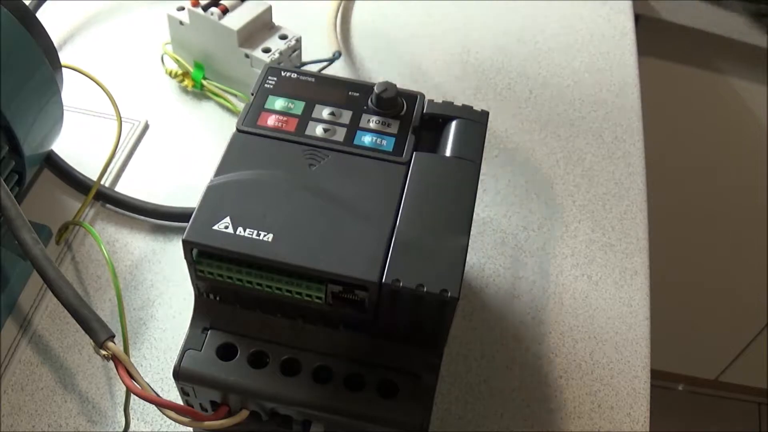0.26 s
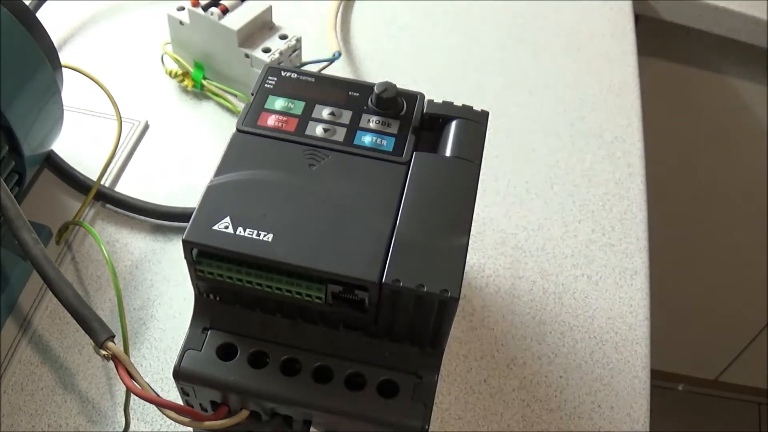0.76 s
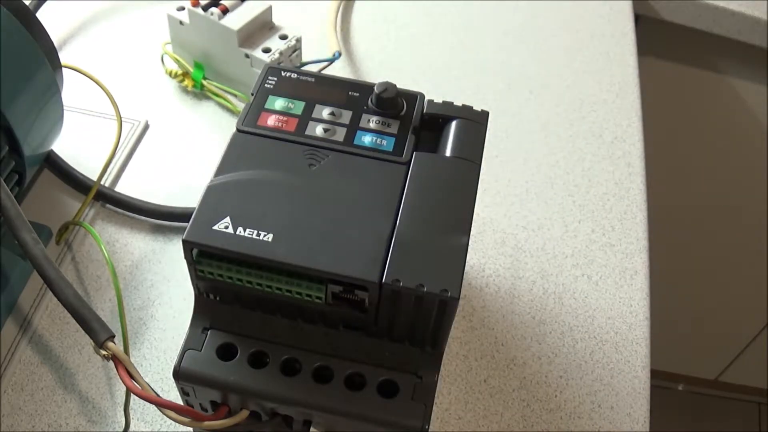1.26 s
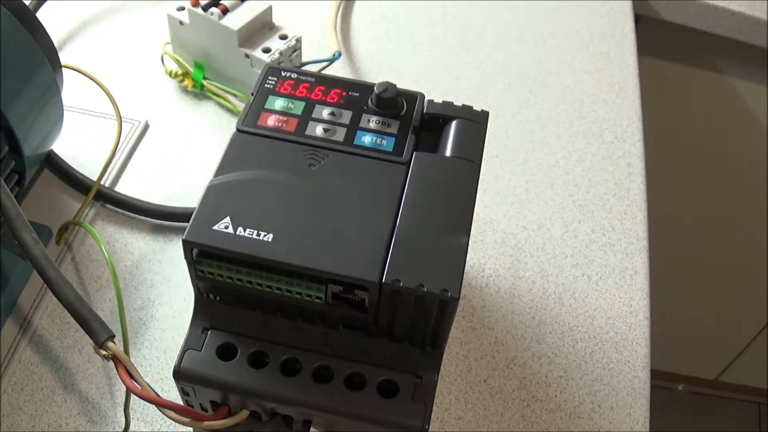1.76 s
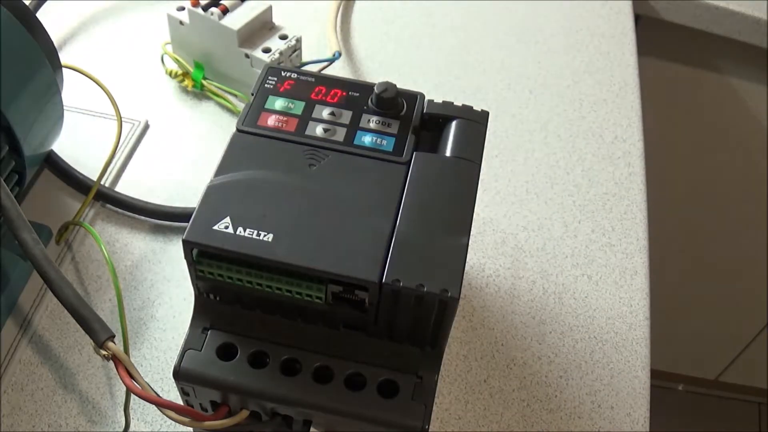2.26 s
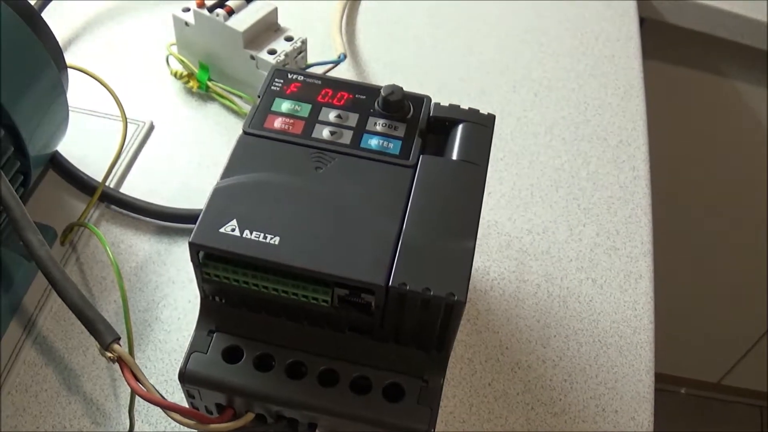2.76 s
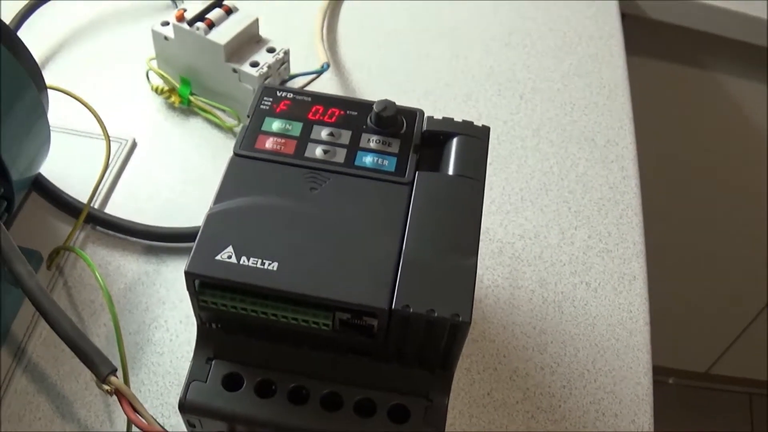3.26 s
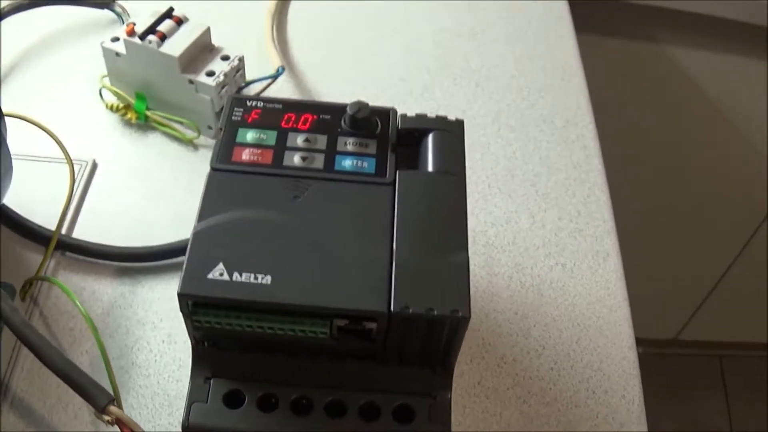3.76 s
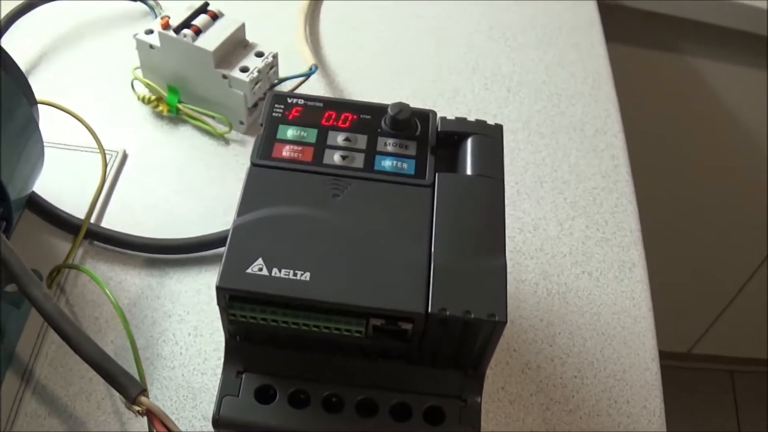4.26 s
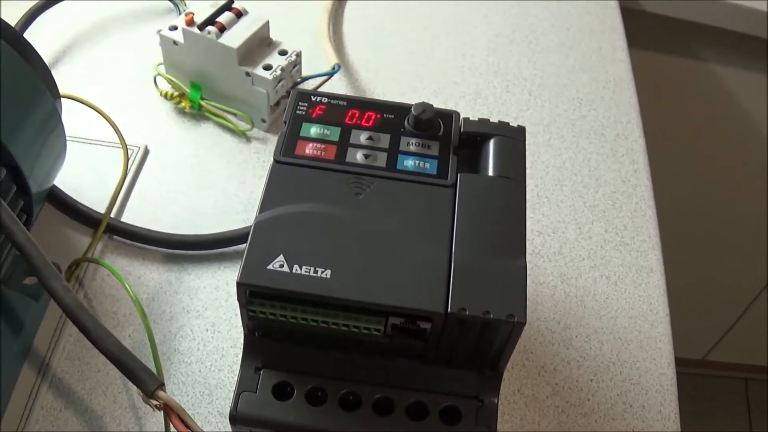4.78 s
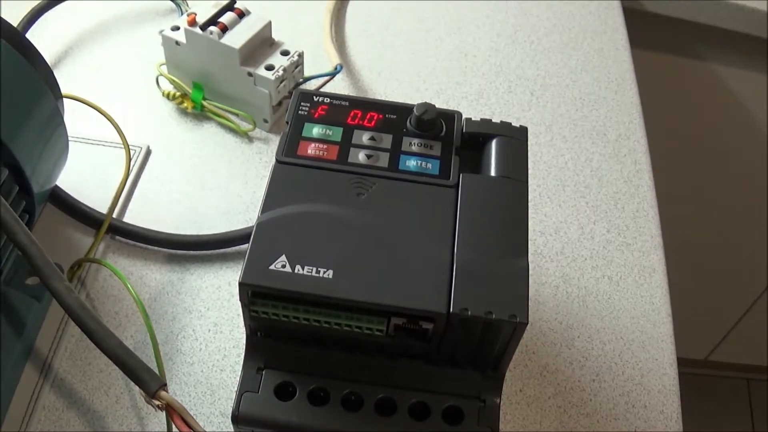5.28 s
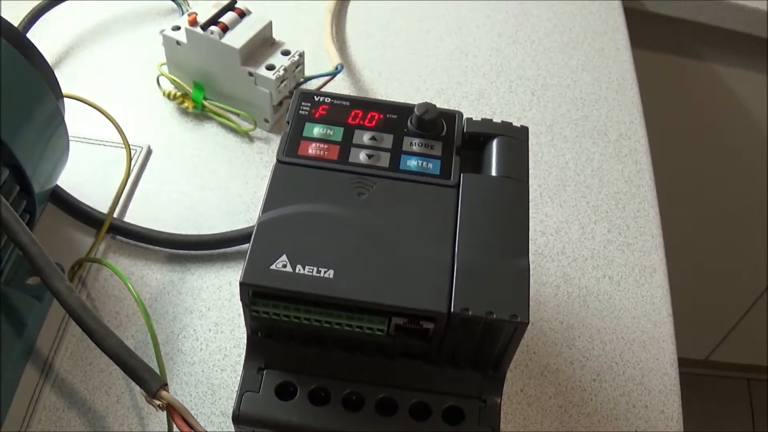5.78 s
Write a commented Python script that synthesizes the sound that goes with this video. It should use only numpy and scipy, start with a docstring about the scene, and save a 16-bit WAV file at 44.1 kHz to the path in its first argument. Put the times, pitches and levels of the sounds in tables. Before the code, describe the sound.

The sound opens on the tail of a circuit breaker's snap, a mid-range knock ringing off the workshop walls and fading over less than a second. Faint hiss and very weak mains hum remain. At about 1.9 s a relay inside a small motor drive clacks, bright and sharp, with several rapid bounces rattling the plastic case and a short room echo. From 2.1 s the cooling fan starts, becoming clear around 2.5 s; its blade tone glides upward and airy rush swells, approaching full speed by 4 s, with a pitch a little above 600 Hz. A small knock comes at 2.6 s. Between 2.9 and 3.9 s the moving camera brings rumble, stuttering low thuds, creaks and bumps. The fan gets nearer and brighter, over a soft low drone. It holds steady to 6 s, with sharp ticks near 4.5, 4.7 and 5.9 s and dull bumps near 4.6 and 5.6 s.

```python
"""In a workshop, a circuit breaker that has just snapped on rings away over faint hiss and mains hum.
A small motor drive wakes: its relay bounces and rattles the case, then its seven-bladed fan spins up.
The fan is phase-driven blade and rotor tones over noise shaped by its ducts, both growing with speed.
A camera carries the microphones closer: shaped noise gives its mount's rumble, ticks, creaks and bumps,
sine pulses that swell and fade give its judder, and a soft low drone fades in."""
import sys
import numpy as np
from scipy import signal
from scipy.fft import rfft, irfft
from scipy.io import wavfile

SR = 44100
rng = np.random.default_rng(int(sys.argv[2]) if len(sys.argv) > 2 else 0)


def store_pcm(level_fs):
    """Save levels as 16-bit WAV."""
    pcm = np.round(np.clip(level_fs, -1, 1) * 32767).astype(np.int16)
    wavfile.write(sys.argv[1], SR, np.atleast_2d(pcm).T)


N = 265790
T = np.arange(N) / SR  # s
HZ = np.fft.rfftfreq(N, 1 / SR)

# First strike of the relay contacts, in seconds
RELAY_S = 1.9303
# Start of the fan in seconds, the blade rate it nears in Hz, time constant of its spin-up in seconds
FAN_ON_S, FULL_HZ, SPIN_UP_S = 2.1, 637.6, 0.52
# How the microphones move in on the fan. Each row: time in seconds, nearness in dB.
NEARNESS = [(2.8, -9.5), (3.3, -6), (3.8, -5), (4.0, -3.5), (4.4, -2), (4.8, -1.24), (5.5, -0.5),
            (6.03, -1)]


def amp(db):
    """Decibels to gain."""
    return 10 ** (np.asarray(db) / 20)


def unit(x):
    """Scales to rms 1."""
    return x / np.sqrt(np.mean(x ** 2) + 1e-20)


def read(points, hz):
    """Reads a table on a log-frequency axis."""
    f, value = np.transpose(points)
    return np.interp(np.log(hz + 1), np.log(f + 1), value)


def curve(rows):
    """A time table, at every sample."""
    return np.interp(T, *np.transpose(rows))


def ramp(start, end):
    """Rises in a straight line from 0 to 1 between two times in seconds."""
    return np.clip((T - start) / (end - start), 0, 1)


def add(mix, s, sound):
    """Mixes a stereo sound in at time s."""
    part = mix[:, max(round(s * SR), 0):][:, :sound.shape[1]]
    part += sound[:, :part.shape[1]]


def pan(x, left_db):
    """Makes the left channel louder than the right by left_db."""
    return x * amp([[left_db / 2], [-left_db / 2]])


def peak(hz, centre, width):
    """Bell of one resonance, 1 at its centre."""
    return 1 / (1 + ((hz - centre) / width * np.sqrt(2)) ** 2)


def noise(gain, spread=0.96, size=N):
    """Stereo noise of rms 1 with a given spectrum; spread widens it."""
    # Likeness of the two microphone channels. Each row: frequency in Hz, correlation from -1 to 1.
    likeness = [(50, 1), (150, 0.98), (320, 0.72), (700, 0.66), (1500, 0.75), (3000, 0.77), (5000, 0.72),
                (9000, 0.97), (14000, 1)]
    hz = np.fft.rfftfreq(size, 1 / SR)
    mid, side = rfft(rng.standard_normal((2, size)))
    alike = np.clip(read(likeness, hz), 0, 1)
    side = side * spread * np.sqrt((1 - alike) / (1 + alike))
    return unit(irfft(np.array([mid + side, mid - side]) * gain, size))


def drift(rate_hz):
    """Slow random wandering of rms 1, mostly below rate_hz."""
    return unit(irfft(rfft(rng.standard_normal(N)) / (1 + (HZ / rate_hz) ** 4), N))


def room_tail(gain, spread):
    """Diffuse sound of the workshop, each band dying at its own speed."""
    # Ring of the room. Each row: frequency in Hz, time to die by 60 dB in seconds.
    ring_times = [(150, 0.77), (500, 0.73), (1200, 0.75), (2500, 0.96), (5000, 0.63), (8500, 0.6),
                  (14000, 0.3)]
    burst = noise(gain, spread)[:, :2 * SR]
    hz, t, bands = signal.stft(burst, SR, nperseg=512)
    decay = amp(-60 * t / read(ring_times, hz)[:, None])
    return signal.istft(bands * decay, SR, nperseg=512)[1]


def breaker(level_db=-21.0, early_db=0, early_s=0.0028):
    """The last strong reflections of the snap, then the room's decay."""
    # The snap as the room returns it. Each row: frequency in Hz, relative density in dB per Hz.
    snap = [(35, -64), (60, -40), (102, -12.5), (129, -25), (190, -2), (269, -12.5), (339, -9.5),
            (564, -7.5), (605, -1), (960, -7.5), (1100, 2), (1390, -4.5), (2530, -21.5), (8040, -28.5),
            (15000, -59)]
    out = np.zeros((2, N))
    add(out, 0, room_tail(amp(read(snap, HZ)), spread=0.95))
    reflections = 1 + amp(early_db) * np.exp(-T / early_s)
    return out * amp(level_db) * reflections * ramp(0, 0.0014)


def still_room(hiss_db=-53, waver=0.3, rate_hz=3):
    """Faint hiss and a slightly wavering mains hum."""
    # Hiss of the still room. Each row: frequency in Hz, relative density in dB per Hz.
    hiss = [(30, -10), (50, -4), (80, -9), (135, -4), (175, 0), (240, -5), (290, -3), (600, -7),
            (1500, -10.5), (3400, -15), (6000, -17.5), (9200, -17), (12000, -23), (15500, -28)]
    # Hum lines. Each row: frequency in Hz, rms level in dB before the wavering.
    hum_lines = [(49, -65.5), (199, -67)]
    hum = 0
    for hz, db in hum_lines:
        phase = 2 * np.pi * hz * T + waver * drift(rate_hz)  # waver in radians here
        swell = 1 + waver * drift(rate_hz)  # and as a share of the level here
        hum = hum + amp(db) * np.sqrt(2) * np.sin(phase) * swell
    return amp(hiss_db) * noise(amp(read(hiss, HZ))) + hum


def contact_force(t, rebound_db=-8, loss_db=2.0, close_s=0.00052, contact_s=0.0011, count=4):
    """The contacts strike, then bounce ever sooner and more weakly."""
    first_gap_s, gap_keep = 0.0034, 0.86  # each next gap keeps this share of the last

    def blow(s):
        """One blow: a quick rise to time s, a slower fall."""
        return np.exp(-abs(t - s) / np.where(t < s, close_s, contact_s))

    bounces = RELAY_S + np.cumsum(first_gap_s * gap_keep ** np.arange(count))
    rebounds = sum(amp(rebound_db - loss_db * k) * blow(s) for k, s in enumerate(bounces))
    return blow(RELAY_S) + rebounds


def relay(strike_db=-22.5, room_db=-29, build_s=0.0049, size=2048):
    """Bouncing contacts rattle the plastic case, and the room answers."""
    # Resonances of relay and case. Each row: centre in Hz, width in Hz, relative level in dB.
    case_modes = [(900, 170, -4), (1400, 350, -7.5), (1950, 330, -8), (2550, 330, -7.5), (4600, 420, -9),
                  (5800, 300, -11), (6400, 350, -2), (7250, 450, -6), (8300, 500, 5), (9150, 450, 0),
                  (10200, 500, 4), (12200, 2000, -17), (14500, 1200, -27)]
    # Colour that the room gives the relay. Each row: frequency in Hz, gain in dB.
    room_colour = [(300, -8), (880, 8), (1400, -3.5), (2500, -4.5), (4600, 4), (6400, -0.5), (8300, -4),
                   (10500, -3), (14000, 1)]
    start = RELAY_S - 0.0014  # room for the rise of the first blow
    t = start + np.arange(size) / SR
    modes = sum(amp(db) * peak(HZ, hz, width) for hz, width, db in case_modes)
    body = modes * HZ ** 2 / (HZ ** 2 + 450 ** 2) + 1e-4  # weak below 450 Hz
    # minimum phase: the case rings only after a blow
    log_body = np.log(np.r_[body, body[-2:0:-1]])
    causal = np.exp(np.conj(signal.hilbert(log_body)))
    ring = irfft(causal[:len(HZ)], N)[:size]
    rattle = contact_force(t) * noise(1, size=size)
    clack = unit(signal.oaconvolve(rattle, ring[None], axes=1)[:, :size])
    out = np.zeros((2, N))
    answer = room_tail(body * amp(read(room_colour, HZ)), spread=1.15)
    add(out, start, amp(room_db) * answer)
    out *= ramp(start, start + build_s)  # the room takes a moment to fill
    add(out, start, pan(amp(strike_db) * clack, left_db=2.5))
    return out


def fan_motor(level_db=-58):
    """The motor's switching rings the fan frame, fading in from the moment it is powered."""
    # Resonances of the frame. Each row: centre in Hz, width in Hz, relative level in dB.
    frame_modes = [(1630, 80, 0), (6300, 300, -13)]
    frame = sum(amp(db) * peak(HZ, hz, width) for hz, width, db in frame_modes)
    return amp(level_db) * noise(frame) * ramp(FAN_ON_S, 2.52)


def speed():
    """Share of full fan speed: the motor's push fades as the rotor gains on it."""
    return 1 - np.exp(-np.maximum(T - FAN_ON_S, 0) / SPIN_UP_S)


def airflow(growth_db):
    """Gain of a fan sound that grows by growth_db for each tenfold of speed."""
    return amp(growth_db * np.log10(speed() + 1e-4))


def rush_level(full_db=-28.5, growth_db=75.5):
    """The rush of air grows with speed and with the microphones' approach."""
    return amp(full_db + curve(NEARNESS)) * airflow(growth_db)


def fan_air(brighten_db=12, chop=0.079, swell_db=0.32):
    """Turbulence in the ducts, chopped by the blades and duller while the fan is slow."""
    # Rush of air. Each row: frequency in Hz, relative density in dB per Hz.
    rush = [(30, 8.5), (100, -8.5), (350, -4), (600, 4), (1200, -0.5), (2300, -2.5), (3400, -5.5),
            (5800, -9), (7600, -3), (9300, -4), (11000, -11.5), (12200, -18.5), (15500, -25.5)]
    # Resonances of the air ducts. Each row: centre in Hz, width in Hz, lift in dB.
    ducts = [(428, 21, 9), (685, 213, 5.5), (1010, 200, 6.5), (1383, 66, 6), (1784, 420, 12.5),
             (2653, 136, 7.5), (2960, 280, 7), (3630, 430, 7), (4280, 990, 7), (5400, 460, 4),
             (6150, 190, 4), (9440, 440, 4.5)]
    lift_db = sum(db * peak(HZ, hz, width) ** 2 for hz, width, db in ducts)
    air = noise(amp(read(rush, HZ) + lift_db))
    low = irfft(rfft(air) / (1 + (HZ / 3500) ** 4), N)
    # fine eddies need speed: the treble gains brighten_db per doubling
    air = low + (air - low) * amp(brighten_db * np.log2(speed() + 1e-3))
    air *= 1 + chop * np.cos(2 * np.pi * np.cumsum(FULL_HZ * speed()) / SR)
    return pan(air * rush_level() * amp(swell_db * drift(13.5)), left_db=0.4)


def knock(centre, octaves, decay, size=8192):
    """A short dying burst in one band: centre in Hz, decay in seconds."""
    t, hz = np.arange(size) / SR, np.fft.rfftfreq(size, 1 / SR)
    burst = noise(np.exp(-(np.log2((hz + 1) / centre) / octaves) ** 2), size=size)
    return burst * np.exp(-t / decay) * (1 - np.exp(-t * centre * 2))


def knocks():
    """Ticks of plastic, creaks of the mount and bumps on the camera: dying bursts of noise."""
    # Levels below are those of the bursts before they decay.
    # Ticks of plastic. Each row: start in seconds, level in dB, centre in Hz, width in octaves.
    ticks = [(2.315, -47, 3700, .7), (2.636, -36, 2960, 1.44), (2.639, -28.5, 960, 0.82),
             (2.6545, -40.5, 3300, 0.58), (2.872, -42, 8950, 0.31), (4.483, -22, 8300, .3),
             (4.741, -26, 9000, 0.26), (5.944, -22, 8720, 0.21), (5.984, -26.5, 6200, .25)]
    # Sharp clicks of the creaking mount. Each row: start in seconds, level in dB.
    creaks = [(3.006, -40), (3.062, -34), (3.107, -28.5), (3.297, -28), (3.346, -29.5), (3.390, -30),
              (3.473, -30), (3.825, -27)]
    # Dull bumps on the camera body.
    # Each row: start in seconds, level in dB, centre in Hz, width in octaves, decay in seconds.
    bumps = [(2.94, -33.5, 230, 1.9, 0.012), (3.10, -26.5, 280, 1.6, 0.01),
             (3.382, -24.5, 170, 3.05, 0.012), (3.815, -25, 130, 0.99, .018), (3.885, -37, 250, 1.6, .01),
             (4.578, -27.5, 115, 1.3, 0.022), (4.609, -32, 55, 0.83, 0.027),
             (5.592, -30.5, 280, .68, 0.019)]
    out = np.zeros((2, N))
    for s, db, centre, octaves in ticks:
        add(out, s, amp(db) * knock(centre, octaves, decay=0.0035))
    for s, db in creaks:
        add(out, s, amp(db) * knock(centre=3400, octaves=0.96, decay=0.0021))
    for s, db, centre, octaves, decay in bumps:
        add(out, s, amp(db) * knock(centre, octaves, decay))
    return out


def standing_waves(hz, far_share=0.35, near_share=0.11):
    """The room's echo adds to the rising tone or weakens it, less so once the camera is close."""
    dip_hz, spacing_hz = 579.3, 17  # one dip, and the spacing of the dips
    share = far_share + (near_share - far_share) * ramp(3.84, 4.1)
    return abs(1 - share * np.exp(2j * np.pi * (hz - dip_hz) / spacing_hz))


def fan_tones(flutter=0.026, rotor_flutter=0.58, lead=0.079):
    """Blades chop the air past the struts; eddies make the upper harmonics flutter more."""
    # Weak lines of the unbalanced rotor.
    # Each row: multiple of the shaft rate, dB against the rush of air at full speed.
    rotor_lines = [(1, -27.5), (2, -28), (3, -26.5), (9, -19.5), (10, -23.5), (11, -25.5), (12, -21),
                   (29, -26.5), (42, -21), (56, -25.5)]
    # Overtones of the blades, at full speed and before the housing's lift.
    # Each row: multiple of the blade rate, level in dB off the outlet's axis, dB gained on its axis,
    # growth in dB per tenfold speed, flutter as a share.
    overtones = [(2, -53.5, 11.5, 27, .33), (3, -49.5, 3, 106, 0.14), (4, -56.5, 12, 62, 0.39)]
    blades = 7
    blade_db, blade_growth_db = -20.5, 96  # at full speed; per tenfold speed
    focus = 1.59  # dB that the blade tone gains per dB of nearness
    housing_hz, housing_width_hz, housing_db = 1797, 305, 13  # band that lifts a passing overtone
    hz = FULL_HZ * speed()
    angle = 2 * np.pi * np.cumsum(hz) / SR
    ports = np.array([[lead / 2], [-lead / 2]])  # radians: the left microphone leads

    def line(multiple, depth, offset):
        """One fluttering tone, of rms 1 before its flutter."""
        wobble = 1 + depth * (drift(22) + 1j * drift(8.1))
        return np.sqrt(2) * (wobble * np.exp(1j * (multiple * angle + offset))).real

    blade = amp(blade_db + focus * curve(NEARNESS)) * airflow(blade_growth_db)
    out = blade * standing_waves(hz) * line(1, flutter, ports / 2)
    in_beam = ramp(4.16, 4.34)  # the microphones enter the outlet's beam
    for order, db, beam_db, growth_db, depth in overtones:
        housing = 1 / (1 + (2 * (order * hz - housing_hz) / housing_width_hz) ** 4)
        level = amp(db + housing_db * housing + beam_db * in_beam) * airflow(growth_db)
        out += level * line(order, depth, ports)
    rotor = sum(amp(db) * line(order / blades, rotor_flutter, ports) for order, db in rotor_lines)
    out += rush_level() * speed() ** 2 * rotor
    return pan(out, left_db=2.0) * ramp(2.38, 2.63)


def handling(lump_db=3.0):
    """The camera's mount rubs unevenly as each push swells and eases."""
    # Pushes that shift the camera.
    # Each row: time of greatest force in seconds, level in dB, rise in seconds, fall in seconds.
    pushes = [(2.78, -53, 0.022, 0.092), (3.42, -33.5, .27, .29), (3.82, -32, 0.096, 0.07)]
    # Rumble of the mount. Each row: frequency in Hz, relative density in dB per Hz.
    rumble = [(15, -38), (25, -7), (91, 2.5), (113, -2), (140, -2), (298, -6.5), (378, -15), (420, -12),
              (550, -14), (920, -120)]
    force = 0
    for s, db, rise, fall in pushes:
        force = force + amp(db) * np.exp(-((T - s) / np.where(T < s, rise, fall)) ** 2)
    return force * amp(lump_db * drift(34)) * noise(amp(read(rumble, HZ)), spread=1.0)


def judder(first_db=-37, last_db=-31, hz=85, length_s=0.012, count=10):
    """The mount sticks and slips under a growing push; each slip is a soft low thud."""
    first_slip_s, every_s = 3.034, 0.0478
    out, t = np.zeros((2, N)), np.arange(-2048, 2048) / SR  # t = 0 is the middle of a thud
    for k, db in enumerate(np.linspace(first_db, last_db, count)):
        tone = np.sin(2 * np.pi * hz * t + rng.standard_normal())
        thud = amp(db) * np.exp(-(t / length_s) ** 2) * tone
        add(out, first_slip_s + k * every_s + t[0], np.array([thud, thud]))
    return out


def drone(hz=161, width=14, level_db=-47, sink_db=-5):
    """A soft low drone of narrow noise fades in as the camera nears, and sinks after a while."""
    level = amp(level_db + sink_db * ramp(4.8, 4.98))
    return level * noise(peak(HZ, hz, width)) * ramp(3.3, 4.4)


def scene():
    """Breaker, relay, fan and camera noises over the quiet room."""
    fan = fan_motor() + fan_air() + fan_tones()
    camera = knocks() + handling() + judder()
    return breaker() + still_room() + relay() + fan + camera + drone()


def record(dry, low_cut_hz=38, edge_hz=15800):
    """The microphone's low cut and the recorder's band limit."""
    low_cut = signal.butter(4, low_cut_hz, "high", fs=SR, output="sos")
    wet = signal.sosfilt(low_cut, dry)
    band_limit = signal.firwin(511, edge_hz, window=("kaiser", 9), fs=SR)
    return signal.oaconvolve(wet, band_limit[None], "same", axes=1)


dry = scene()
out = record(dry)
store_pcm(out)
```